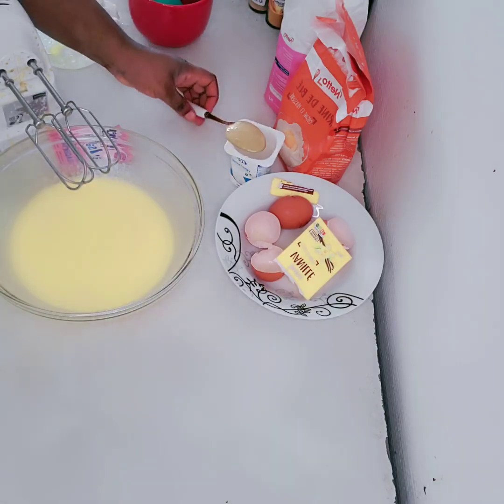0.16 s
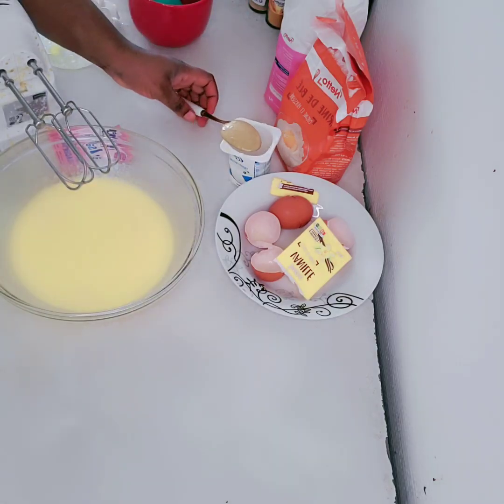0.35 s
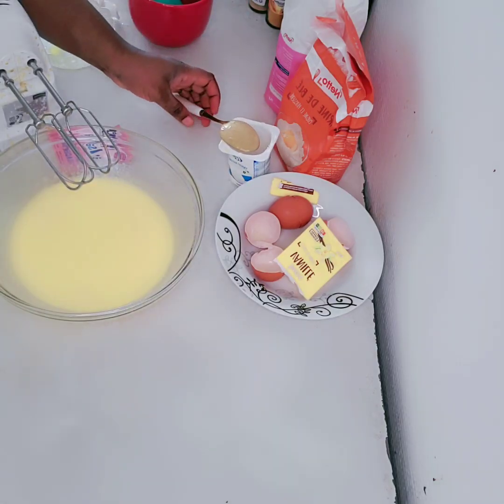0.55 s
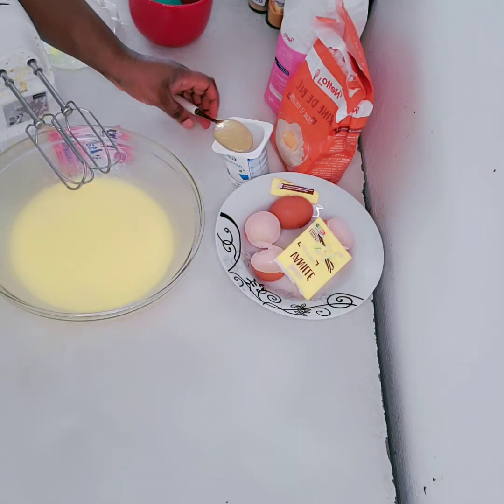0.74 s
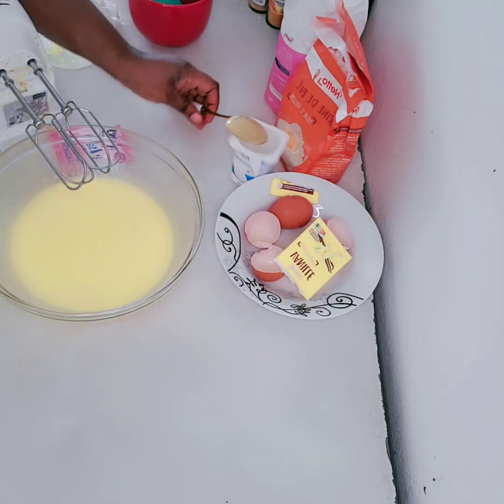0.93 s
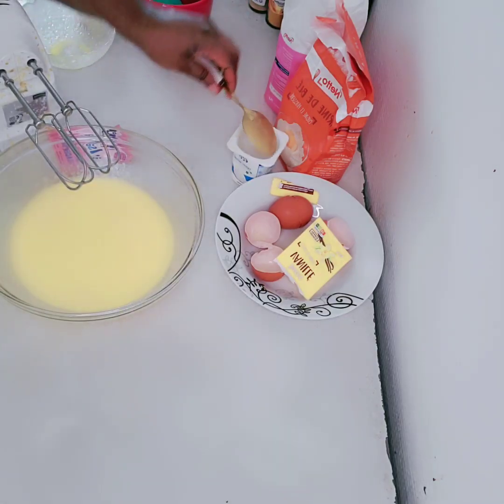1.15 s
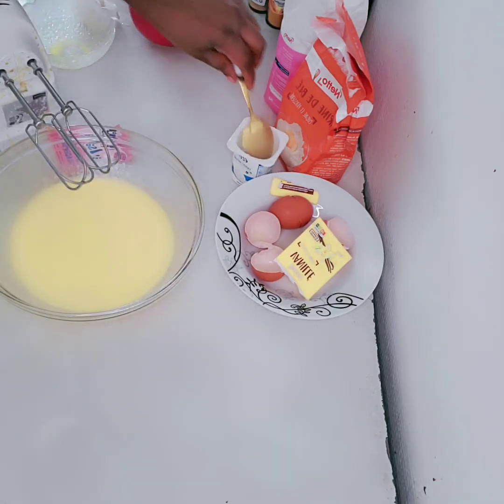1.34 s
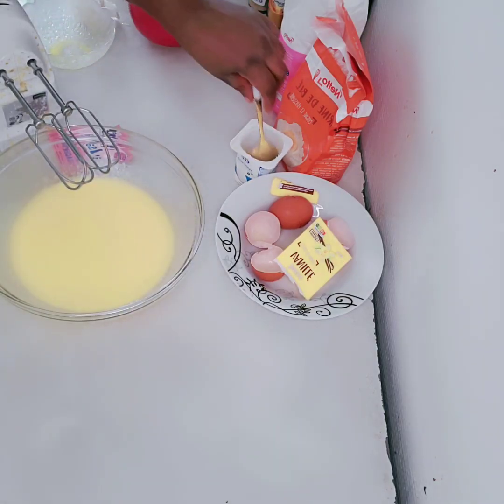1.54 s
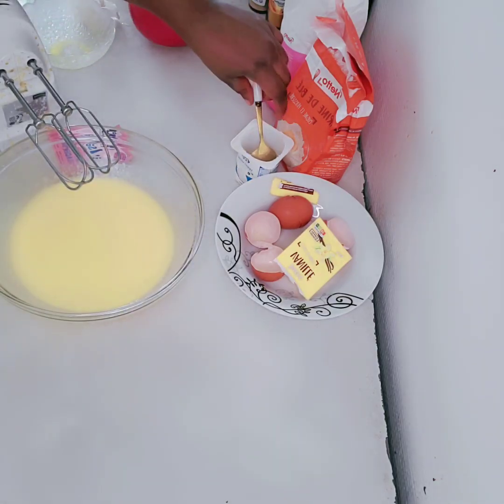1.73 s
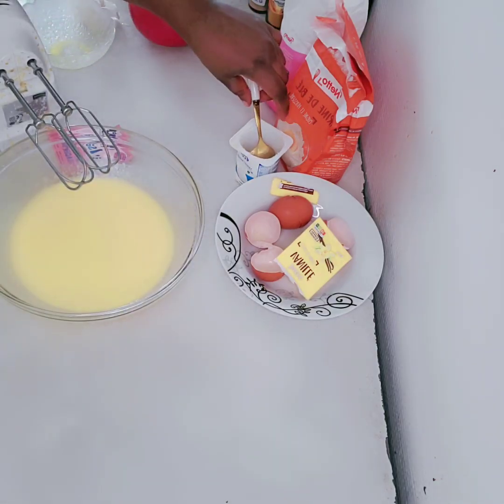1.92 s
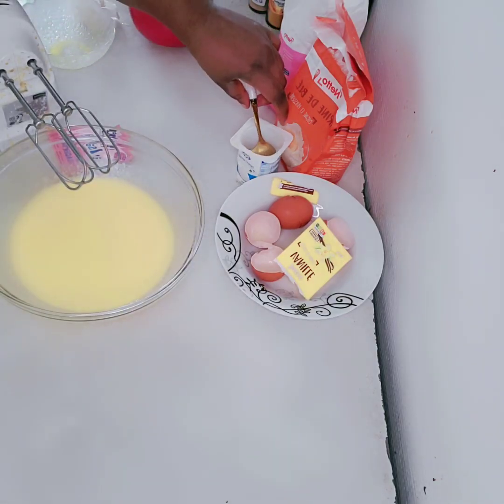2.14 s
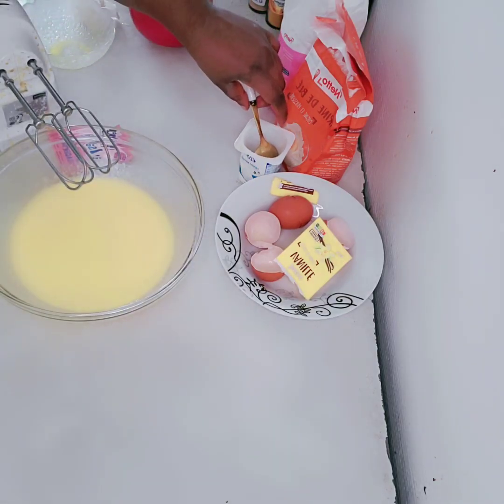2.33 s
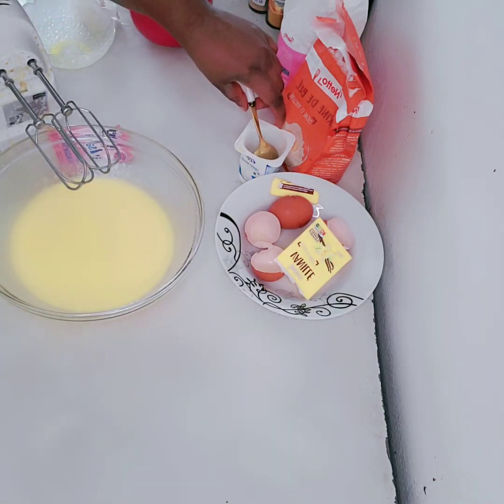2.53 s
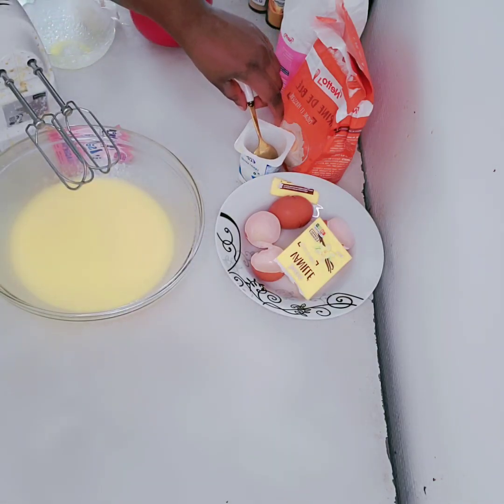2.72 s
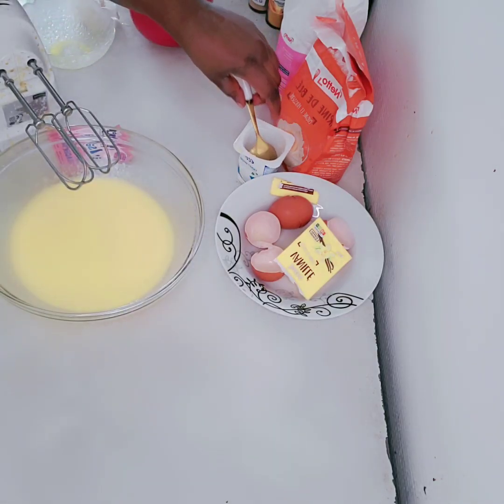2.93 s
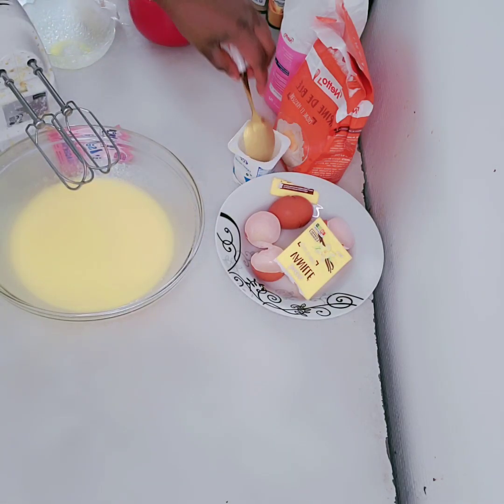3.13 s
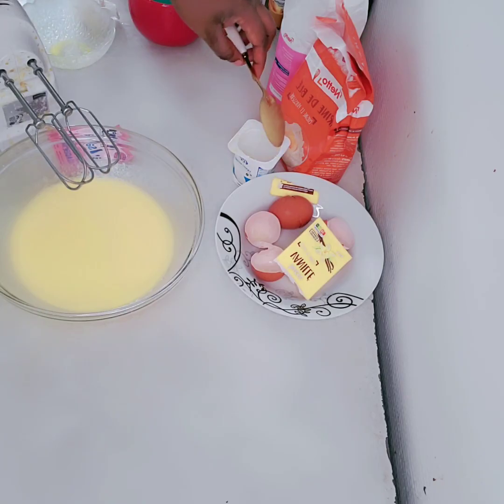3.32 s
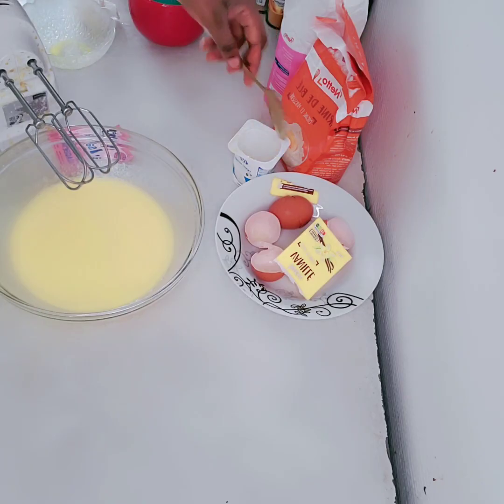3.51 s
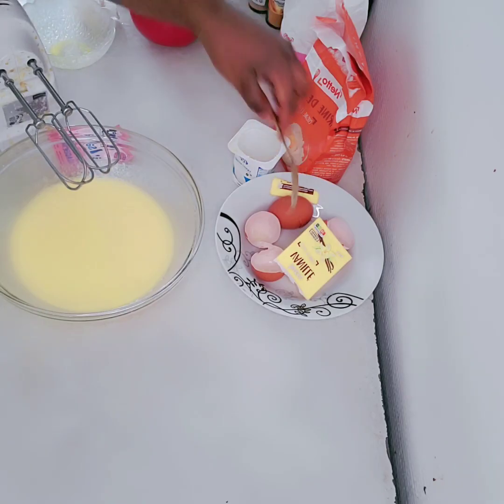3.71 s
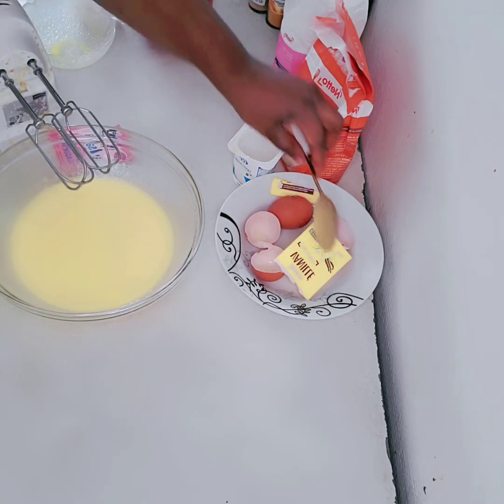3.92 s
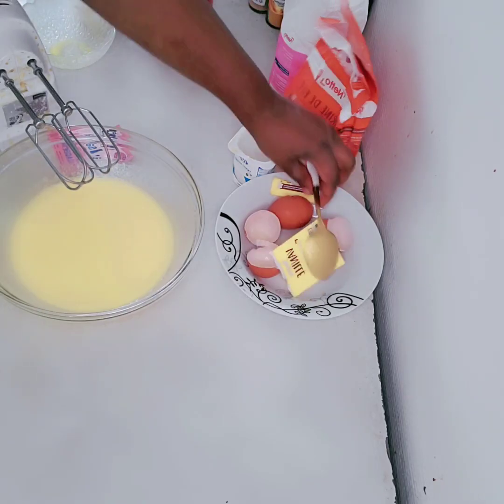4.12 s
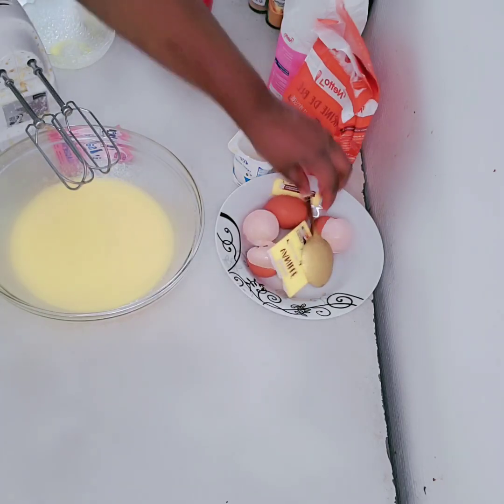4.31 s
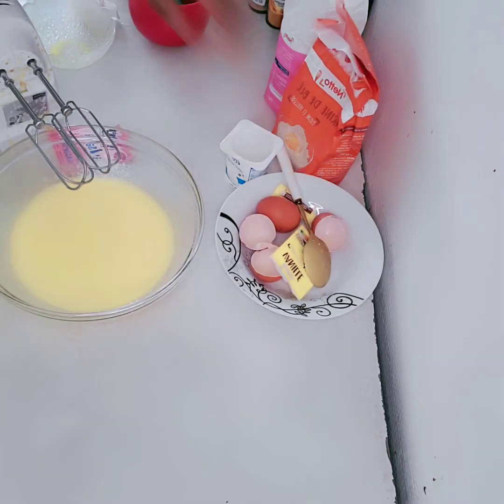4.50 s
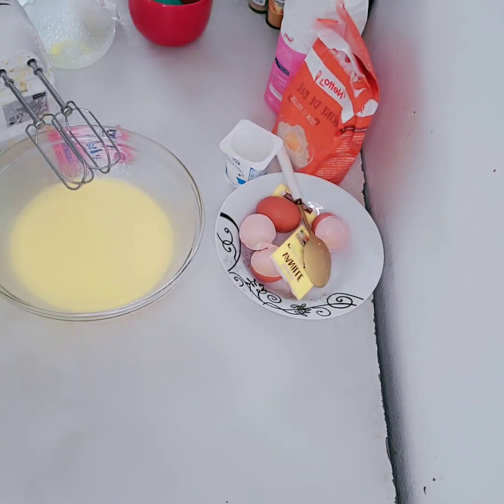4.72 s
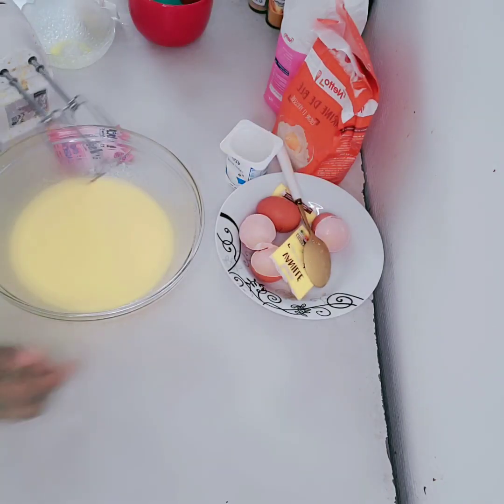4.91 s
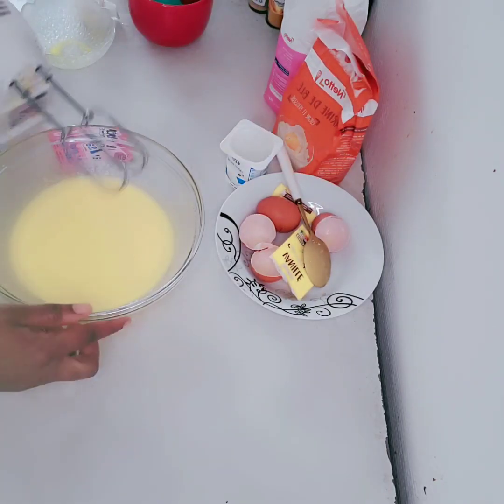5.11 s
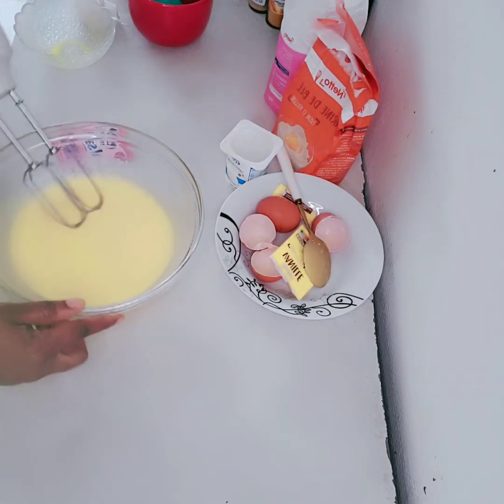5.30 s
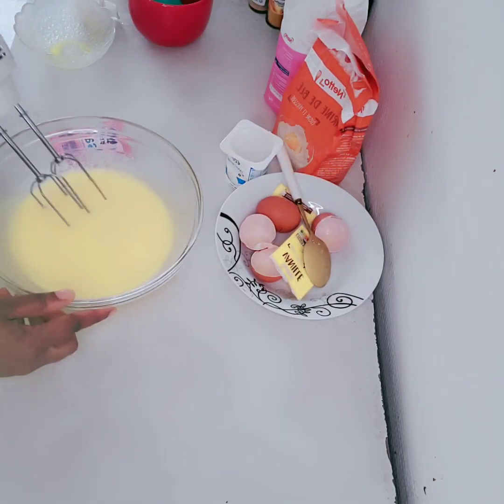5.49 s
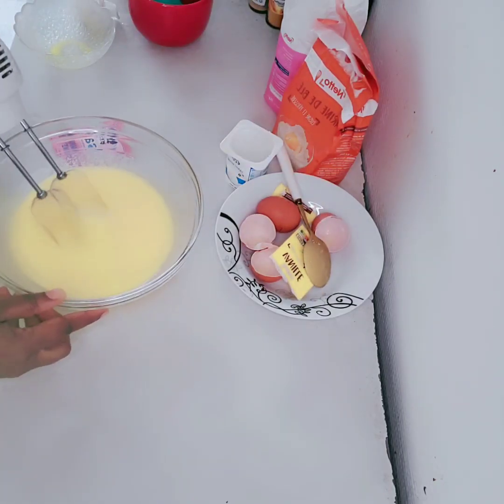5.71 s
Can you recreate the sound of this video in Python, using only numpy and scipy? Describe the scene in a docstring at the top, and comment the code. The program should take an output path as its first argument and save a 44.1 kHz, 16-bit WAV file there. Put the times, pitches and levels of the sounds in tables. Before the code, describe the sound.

In a quiet kitchen, a box is knocked, a spoon taps a plastic cup and lands on china, and beaters clink against glass.

```python
"""Two quick knocks on a small box, in a quiet, hard-walled kitchen heard by a phone over the counter.
A spoon scrapes and taps in a plastic cup and is laid on a china plate with a clink; then steel beaters
strike a glass bowl, which shifts on the counter. Each blow rings the object's modes and thuds into the
counter; scrapes are dense slips through hollow resonances. A low rumble wavers beneath."""
import sys
import numpy as np
from scipy import signal
from scipy.fft import rfft, irfft
from scipy.io import wavfile
from scipy.ndimage import uniform_filter1d

SR = 44100
rng = np.random.default_rng(int(sys.argv[2]) if len(sys.argv) > 2 else 0)


def dump(signal):
    """Clip the signal to [-1, 1] and save it as 16-bit WAV at the path in sys.argv[1]."""
    limited = np.clip(np.atleast_2d(signal).T, -1, 1)
    pcm = np.round(limited * 32767).astype(np.int16)
    wavfile.write(sys.argv[1], SR, pcm)


N = 253575
T = np.arange(N) / SR

# contact noise by object: centre_hz, width_hz, t60_s, tick_re_ring_db
CONTACT_NOISE = {"box": (1300, 2399.5, 0.04, -21.5), "plate": (1756.5, 5101.5, 0.19, -14.5),
                 "bowl": (1691, 2701, 0.13, -17)}


def box_knocks():
    """Knocks ring a box too small to radiate bass."""
    # blows: start_s, ring_peak_db, crack_re_ring_db
    hits = [(.138, -15.5, -2.5), (.1625, -15.5, -3.5)]
    # box modes: pitch_hz, level_db, t60_s
    modes = [(320, -10, .04), (475, -6.5, 0.13), (634, -6, 0.0087), (770, 3.5, 0.022), (1110, 4, 0.031),
             (1444, 1.5, 0.025), (1890, 2, 0.042), (2380, -3, 0.01), (2690, 0, 0.045), (3030, -3.5, 0.11),
             (3360, -13, 0.014), (4117, -17.5, 0.013), (5680, -12.5, 0.013)]
    knocks = blows(hits, modes, CONTACT_NOISE["box"], thud_db=-34.5)
    return signal.sosfilt(signal.butter(4, 310, "high", fs=SR, output="sos"), knocks)


def plate_clink():
    """The spoon lands on china and bounces once."""
    # blows: start_s, ring_peak_db, crack_re_ring_db
    hits = [(4.3974, -9, -12.5), (4.4254, -8.5, -7.5)]
    # plate modes: pitch_hz
    modes_hz = [251, 438, 747, 1546, 1857, 2449, 2720, 3042, 3520, 3588, 4730, 5550, 6045, 6664, 7262, 7800,
                8156, 8748, 9178, 9905, 10965, 11542, 12862, 13695]
    # ring per mode: level_db, t60_s
    decays = [(-11, .12), (-15, .15), (-11.5, .16), (-2, .2), (-16.5, .25), (0, .28), (-16.5, .16),
              (-16, .16), (-2, .42), (-9.5, .15), (-2, .15), (-17, .1), (-15.5, .2), (-13, .15),
              (-14.5, .13), (-20, .1), (-18.5, .1), (-2, .09), (-3, .09), (-10, .08), (-10, .1), (-11, .15),
              (-7, .13), (-9, .13)]
    return blows(hits, np.column_stack([modes_hz, decays]), CONTACT_NOISE["plate"], thud_db=-27)


def bowl_strikes():
    """Steel beaters ring a glass bowl in three quick contacts."""
    # blows: start_s, ring_peak_db, crack_re_ring_db
    hits = [(5.3937, -13, -13), (5.4084, -14, -10.5), (5.4207, -15, -16)]
    # bowl modes: pitch_hz
    modes_hz = [124, 477, 867, 1238, 1992, 2396, 2650, 3110, 3278, 4237, 4318, 5760, 7424, 8440, 9117,
                10990, 12440, 13020]
    # ring per mode: level_db, t60_s
    decays = [(-10, 0.19), (-9, 0.18), (-6.5, 0.13), (-3.5, 0.017), (-7, 0.082), (-38, 0.034), (-10, 0.046),
              (1.5, 0.026), (-1.5, 0.031), (-1.5, 0.027), (-1, 0.032), (-2, 0.051), (2.5, 0.054),
              (-9, 0.03), (-3.5, 0.074), (-5, 0.051), (-4.5, 0.039), (-31, 0.034)]
    return blows(hits, np.column_stack([modes_hz, decays]), CONTACT_NOISE["bowl"], thud_db=-58)


def blows(hits, modes, contact, thud_db):
    """Each blow rings, cracks, ticks and thuds into the counter; the next contact chokes its ring."""
    # counter modes: pitch_hz, level_db, t60_s
    counter_modes = [(50.3, 0, 0.6), (72, 2, 0.5), (124, -5, 0.043), (266, -14.5, 0.06)]
    choke_db, choke_s = -12, .002
    hz, width_hz, t60_s, tick_db = contact
    crack_lowpass = signal.butter(4, 3700, fs=SR, output="sos")  # contact time limits the treble
    next_starts_s = [hit[0] for hit in hits[1:]] + [np.inf]
    out = np.zeros(N)
    for (start_s, db, crack_db), next_s in zip(hits, next_starts_s):
        since_next_s = T[:SR // 2] - (next_s - start_s)
        choke = undb(choke_db * np.clip(since_next_s / choke_s, 0, 1))
        add(out, start_s, undb(db) * ring(modes, scatter_db=1.5) * choke)
        crack = signal.sosfilt(crack_lowpass, burst(hz, width_hz, t60_s))
        add(out, start_s, undb(db + crack_db) * crack)
        add(out, start_s, undb(db + tick_db) * burst(9500, 11000, t60_s))
        add(out, start_s, undb(db + thud_db) * ring(counter_modes, scatter_db=1.5))
    return out


def light_taps():
    """Light taps and clacks: a spoon in a plastic cup, later a bowl shifting on the counter."""
    # taps: start_s, level_db, pitch_hz, t60_s, tick_re_level_db, thud_re_level_db
    taps = [(.52, -62, 850, 0.021, -17, -10), (0.656, -55, 540, 0.0049, -19, 2),
            (.969, -48, 850, 0.042, -7, -13.5), (1.025, -46, 700, 0.01, -13, -6),
            (1.157, -41, 1000, 0.073, -41, -26), (1.468, -47, 806, 0.0097, -1, -8),
            (1.506, -33.5, 900, 0.024, -5.5, -8.5), (1.58, -39.5, 960, 0.011, -4, -10),
            (1.627, -25.5, 1480, 0.0052, -1, -13), (1.832, -43, 1150, 0.0067, -11.5, -8),
            (2.453, -63, 690, 0.024, -40, -8), (2.596, -62, 516, .02, -40, -5),
            (3.059, -50.5, 860, 0.048, -34, -24), (3.082, -43.5, 926, 0.051, -9, -23),
            (3.111, -45, 1070, 0.046, 0.5, -16), (3.233, -50, 1260, 0.04, 5.5, -12),
            (3.752, -61, 520, 0.027, -10, 1), (4.091, -38.5, 1230, 0.0088, -3, -16.5),
            (4.157, -43, 2040, .01, 4.5, -15.5), (4.182, -41, 2870, 0.015, -22, -16),
            (4.242, -38, 1166, 0.022, -11.5, -11.5), (4.274, -36.5, 2770, 0.036, -21.5, -12),
            (4.327, -31.5, 890, 0.013, -14, -4), (4.345, -32.5, 810, 0.0062, -7.5, -2.5),
            (4.356, -27, 2790, 0.014, -10.5, -10), (4.369, -26, 1090, 0.02, -5.5, -15.5),
            (5.162, -51.5, 587, 0.11, -14, 0.5), (5.647, -39.5, 815, 0.014, -22, -1),
            (5.669, -33, 792, 0.024, -26, -17), (5.69, -33, 840, 0.015, -20, -9),
            (5.7, -32.5, 1136, .022, -31, -3), (5.724, -27, 2786, 0.026, -3, -20)]
    # counter modes under a light tap: pitch_hz, level_db, t60_s
    counter_modes = [(56.3, 0.5, .15), (123, -2.5, .08), (246, -0.5, .05)]
    rise_s, clack_db = .00065, -4
    rise = 1 - np.exp(-T / rise_s)  # soft onset
    out = np.zeros(N)
    for start_s, db, hz, t60_s, tick_db, thud_db in taps:
        add(out, start_s, undb(db) * ring([(hz, 0, t60_s)], scatter_db=0) * rise[:SR // 2])
        clack = burst(.88 * hz, 1.3 * hz, t60_s=.067) * rise[:SR // 8]
        add(out, start_s, undb(db + clack_db) * clack)
        add(out, start_s, undb(db + tick_db) * burst(7000, 13000, t60_s=.021))
        add(out, start_s, undb(db + thud_db) * ring(counter_modes, scatter_db=2.2))
    return out


def scrapes():
    """Dense uneven slips shake a hollow body and hiss as grit."""
    # strokes: start_s, length_s, body_start_db, body_end_db, grit_re_body_db
    strokes = [(0, 0.079, -63, -89, -15), (0.523, .1, -81, -90, -13), (0.655, .12, -80, -86, -8),
               (0.863, .11, -74.5, -64.5, -13.5), (0.983, 0.21, -64, -80, -11.5),
               (1.468, .04, -65, -53, -5.5), (1.498, 0.13, -50, -59, -7), (2.333, 0.11, -97, -88.5, -11),
               (2.443, .1, -82, -92, -9), (2.6, 0.12, -87, -93, -16), (2.961, 0.14, -79, -58.5, -15),
               (3.079, 0.17, -57.5, -71.5, -3), (3.23, 0.052, -55, -79, -18),
               (3.727, 0.11, -87, -96.5, -15.5), (4.082, 0.12, -62.5, -64, 9),
               (4.242, 0.04, -52.5, -64, -1.5), (4.314, 0.029, -65, -47.5, -7.5),
               (5.086, .07, -79, -74.5, 1), (5.148, 0.24, -83.5, -69.5, -4.5), (5.596, 0.1, -61, -47, -2),
               (5.681, 0.05, -57.5, -44.5, -4)]
    # cup resonances: centre_hz, width_hz, level_db
    cup_modes = [(610, 400, -4), (917, 540, 7), (1110, 70, -2.5)]
    # grit spectrum: freq_hz, density_db
    grit_spectrum = [(880, -36), (1500, -1.5), (2140, -2.5), (2310, -0.5), (4230, -4.5), (4560, -7),
                     (5250, -9.5), (7630, -13.5), (10100, -5.5), (14000, -16)]
    slips = rng.standard_normal(N) * undb(3 * rng.exponential(size=N) + 2.5 * walk(rate_hz=60))
    body = unit(sum(undb(db) * band(band(slips, hz, width), hz, width) for hz, width, db in cup_modes))
    grit = unit(colour(slips, grit_spectrum))
    return sum(stroke(*glide) * (body + undb(grit_db) * grit) for *glide, grit_db in strokes)


def rumble():
    """Deep vibration of building and counter: drifts, wavers and swells briefly."""
    # slow drift of the deep part: time_s, level_db
    drift = [(0, -59), (1.3, -62.5), (2.0, -59), (2.9, -61.5), (3.4, -58.5), (4.0, -65), (4.9, -63),
             (5.75, -57)]
    # counter shaking: start_s, deep_db, upper_db, hold_s
    swells = [(0.129, -51, -69, 0.073), (0.968, -53.5, -67.5, 0.062), (1.113, -55, -63, 0.026),
              (1.61, -34.5, -42, 0.01), (4.097, -57, -67, 0.27), (4.368, -56, -47.5, 0.1),
              (5.12, -51, -62, 0.044), (5.384, -48.5, -43.5, 0.085), (5.631, -67, -50, 0.035),
              (5.691, -58, -39, .03)]
    deep = noise([(18, -30), (35, 5.5), (50, 3), (80, -2.5), (130, -25.5)])
    upper = noise([(80, -19.5), (120, 2.5), (200, -8.5), (400, -13.5), (800, -24)])
    level_db = np.interp(T, *np.transpose(drift)) + 1.5 * walk(rate_hz=9.9)
    bed = undb(level_db) * (deep + undb(-15) * upper)
    shaken = sum(swell(start_s, hold_s) * (undb(deep_db) * deep + undb(upper_db) * upper)
                 for start_s, deep_db, upper_db, hold_s in swells)
    return bed + shaken


def hum():
    """A low tone swells once, sags and stops."""
    start_s, rise_s, hold_s, fall_s = .538, .045, .21, .018
    pitch_hz, rms_db, sag_db = 49.5, -46, -7
    corners_s = start_s + np.cumsum([0, rise_s, hold_s, fall_s])
    envelope = np.interp(T, corners_s, [0, undb(rms_db), undb(rms_db + sag_db), 0])
    return envelope * np.sqrt(2) * np.sin(2 * np.pi * pitch_hz * T)


def noise_floor():
    """Faint steady noise, strongest near 200 Hz."""
    # background spectrum: freq_hz, density_db
    spectrum = [(120, -28.5), (200, 2), (227, -10.5), (271, -3), (312, -18), (423, -18), (543, -31),
                (762, -16), (1030, -25.5), (1450, -25), (1580, -26.5), (2700, -31), (3660, -28),
                (4700, -37.5), (14200, -35)]
    return undb(-78) * noise(spectrum)


def room(x):
    """Direct sound plus a diffuse tail; each half octave decays at its own rate."""
    # kitchen reverberation: freq_hz, t60_s
    decays = [(100, 0.39), (500, .5), (1500, 0.47), (4000, 0.49), (8000, 0.41), (14000, 0.32)]
    tail_db, rise_s = -1.5, .00067
    t = T[:int(.8 * SR)]
    hz, t60_s = np.transpose(decays)
    white, tail = rng.standard_normal(len(t)), 0
    for centre_hz in 60 * 2 ** np.arange(0, 8.1, .5):
        shape = [(centre_hz / np.sqrt(2), -40), (centre_hz / 1.19, -3), (centre_hz, 0),
                 (centre_hz * 1.19, -3), (centre_hz * np.sqrt(2), -40)]
        band_t60_s = np.interp(np.log(centre_hz), np.log(hz), t60_s)
        part = colour(white, shape) * 1000 ** (-t / band_t60_s)
        tail = tail + part * np.sqrt(centre_hz / np.sum(part ** 2))  # equal energy per Hz
    tail = tail * (1 - np.exp(-t / rise_s))
    return x + undb(tail_db) * signal.fftconvolve(x, tail / np.sqrt(np.sum(tail ** 2)))[:N]


def ring(modes, scatter_db):
    """Damped sines after one blow, mode levels scattered at random; peak 1."""
    hz, db, t60_s = np.transpose(modes)[:, :, None]
    t = T[:SR // 2]
    gain = undb(db + scatter_db * rng.standard_normal(hz.shape))
    y = np.sum(gain * np.sin(2 * np.pi * hz * t) * 1000 ** (-t / t60_s), axis=0)
    return y / np.abs(y).max()


def burst(hz, width_hz, t60_s):
    """Decaying band of noise; peak 1."""
    t = T[:SR // 8]
    white = rng.standard_normal(len(t)) * 1000 ** (-t / t60_s)
    y = band(band(white, hz, width_hz), hz, width_hz)
    return y / np.abs(y).max()


def stroke(start_s, length_s, first_db, last_db):
    """Gain of one stroke: a glide in dB with soft ends."""
    inside = (T >= start_s) & (T <= start_s + length_s)
    glide_db = np.interp(T, [start_s, start_s + length_s], [first_db, last_db])
    return uniform_filter1d(inside * undb(glide_db), size=200)


def swell(start_s, hold_s, rise_s=.023, t60_s=.4):
    """Linear rise, hold at 1, exponential fall."""
    t = T - start_s
    return np.clip(t / rise_s, 0, 1) * 1000 ** (-np.maximum(t - rise_s - hold_s, 0) / t60_s)


def walk(rate_hz):
    """Random levels joined by ramps."""
    step = int(SR / rate_hz)
    return uniform_filter1d(np.repeat(rng.standard_normal(N // step + 1), step), step)[:N]


def noise(spectrum):
    """Coloured noise; RMS 1."""
    return unit(colour(rng.standard_normal(N), spectrum))


def colour(x, spectrum):
    """Filter by points of freq_hz, gain_db."""
    hz, db = np.transpose(spectrum)
    bins_hz = np.maximum(np.arange(len(x) // 2 + 1) * SR / len(x), 1)
    gain_db = np.interp(np.log(bins_hz), np.log(hz), db, -120, -120)
    return irfft(rfft(x) * undb(gain_db), len(x))


def band(x, hz, width_hz):
    """Two-pole resonance; gain 1 at the centre."""
    return signal.lfilter(*signal.iirpeak(hz, hz / width_hz, SR), x)


def add(track, start_s, sound):
    i = int(start_s * SR)
    track[i:i + len(sound)] += sound[:N - i]


def undb(db):
    return 10 ** (np.asarray(db) / 20)


def unit(x):
    return x / np.sqrt(np.mean(x ** 2))


def scene():
    """Counter sounds in the room, over rumble, hum and faint noise; mono."""
    hidden_share = .47  # of the knocks' direct sound, which misses the phone
    knocks = box_knocks()
    near = knocks + light_taps() + scrapes() + plate_clink() + bowl_strikes()
    floor = noise_floor()
    return (room(near) - hidden_share * knocks + rumble() + hum() + floor)[None]


def record(dry):
    """Phone microphone: deepest bass dropped, a treble dip from its port, top cut."""
    low_hz, top_hz, dip_depth = 35.2, 14000, .7
    heard = signal.sosfilt(signal.butter(2, low_hz, "high", fs=SR, output="sos"), dry)
    heard = heard - dip_depth * band(heard, hz=7900, width_hz=760)
    return signal.sosfilt(signal.ellip(10, .2, 70, top_hz, fs=SR, output="sos"), heard)


dry = scene()
out = record(dry)
dump(out)
```